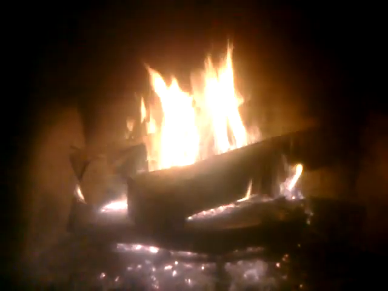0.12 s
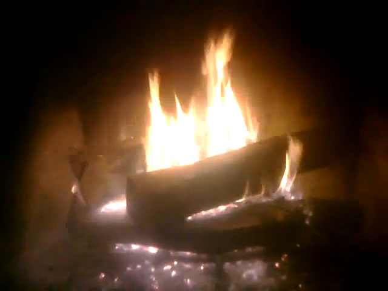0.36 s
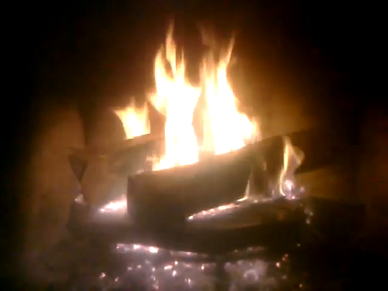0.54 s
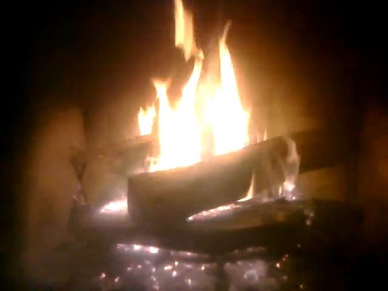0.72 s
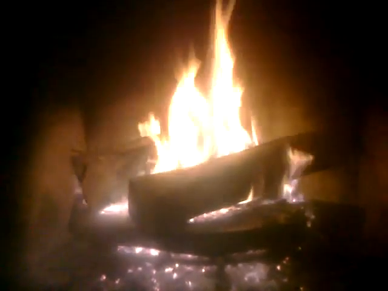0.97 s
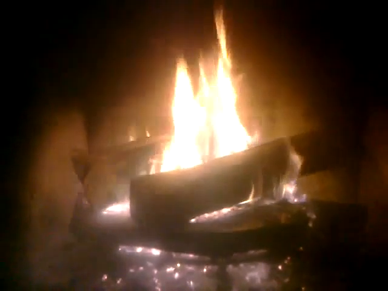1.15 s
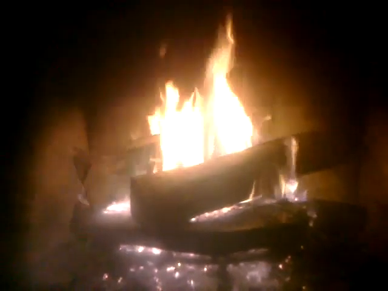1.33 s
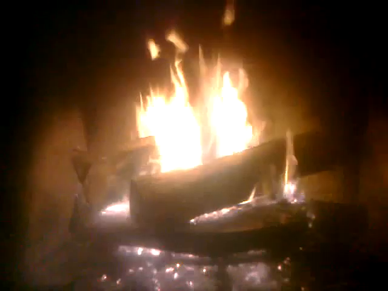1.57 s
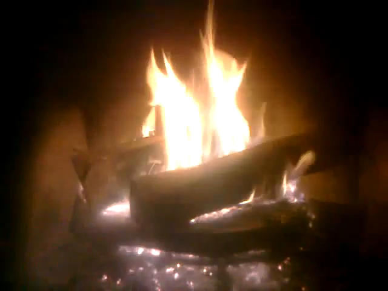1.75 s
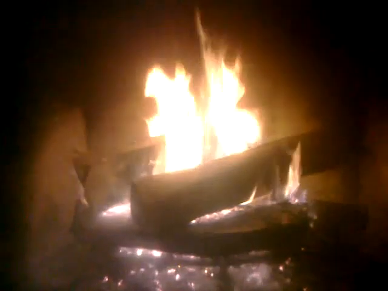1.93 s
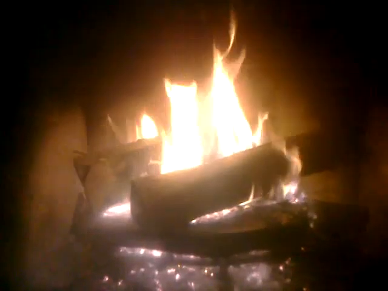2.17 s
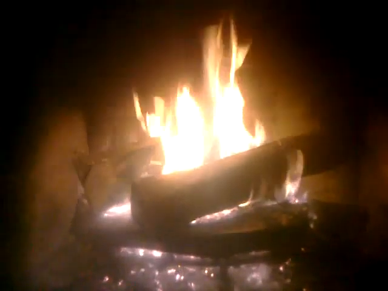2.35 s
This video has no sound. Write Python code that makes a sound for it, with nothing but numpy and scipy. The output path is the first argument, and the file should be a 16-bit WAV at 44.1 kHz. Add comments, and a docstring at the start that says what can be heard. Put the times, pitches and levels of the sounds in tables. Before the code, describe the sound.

A wood fire hisses steadily and rumbles softly, close to the microphone in a room. The wood pops once near the start and ticks lightly. Midway come faint dull knocks and a rustle, then a barely audible whistle.

```python
"""A steady high hiss of steaming sap over a soft rumble of flames: logs burning in a fireplace,
heard close by from one microphone in the room. A pocket in the wood bursts with a loud pop,
followed by small ticks; the firebox rings briefly and the room answers. Midway come a few dull, distant
knocks and a rustle, perhaps wood settling. Near the end, gas whistles faintly through a crack."""
import sys
import numpy as np
from scipy import signal
from scipy.fft import rfft, irfft
from scipy.io import wavfile
from scipy.ndimage import uniform_filter1d

SR = 44100
rng = np.random.default_rng(int(sys.argv[2]) if len(sys.argv) > 2 else 0)


def generate_wav(sig):
    """Save sig (samples, or channels by samples) to the path in sys.argv[1] as 16-bit PCM at SR."""
    pcm = np.round(np.clip(np.atleast_2d(sig).T, -1, 1) * 32767).astype(np.int16)
    wavfile.write(sys.argv[1], SR, pcm)


N = 105840

# decay of the reflections between the firebox walls (frequency [Hz], t60 [s])
FIREBOX_DECAY = [(250, 0.091), (1000, 0.069), (3000, 0.039), (7000, 0.024), (14000, 0.033)]


def amp(db):
    """Decibels to gain."""
    return 10 ** (np.asarray(db) / 20)


def unit(x):
    """Scales to rms 1."""
    return x / np.sqrt(np.mean(x ** 2) + 1e-20)


def read(points, hz):
    """Reads a table on a log-frequency axis."""
    table_hz, value = np.transpose(points)
    return np.interp(np.log(hz + 1), np.log(table_hz + 1), value)


def level(points):
    """A gain curve from (time [s], level [dB]) points."""
    return amp(np.interp(np.arange(N) / SR, *np.transpose(points)))


def add(mix, start_s, sound):
    """Mixes a sound in at its start time."""
    part = mix[round(start_s * SR):][:len(sound)]
    part += sound[:len(part)]


def colour(x, spectrum, size=4096):
    """Minimum-phase filter of unit energy with the given spectrum."""
    log_gain = np.log(amp(read(spectrum, abs(np.fft.fftfreq(size, 1 / SR)))))
    response = np.exp(np.conj(signal.hilbert(log_gain)))
    taps = np.fft.ifft(response).real[:size // 2]
    return signal.fftconvolve(x, taps / np.linalg.norm(taps))[:len(x)]


def noise(spectrum):
    """Steady noise of rms 1 with the given spectrum."""
    gain = amp(read(spectrum, np.fft.rfftfreq(N, 1 / SR)))
    return unit(irfft(rfft(rng.standard_normal(N)) * gain, N))


def wander(rate_hz):
    """Slow random motion of rms 1."""
    lowpass = np.exp(-(np.fft.rfftfreq(N, 1 / SR) / rate_hz) ** 2)
    return unit(irfft(rfft(rng.standard_normal(N)) * lowpass, N))


def echoes(x, decay, delay_s, size=32768):
    """Dense reflections reach the microphone after a delay, each band dying at its own speed."""
    hz, t, bands = signal.stft(rng.choice([-1., 1.], size), SR, nperseg=128)
    fade = amp(-60 * t / read(decay, hz)[:, None])
    _, tail = signal.istft(bands * fade, SR, nperseg=128)
    reflected = np.zeros(N)
    add(reflected, delay_s, signal.fftconvolve(x, tail / np.linalg.norm(tail)))
    return reflected


def steam():
    """A steady hiss from the logs with tiny bursts of boiling sap, rippled by the firebox walls."""
    # spectrum of the escaping steam (frequency [Hz], relative level [dB])
    hiss_spectrum = [(1410, -44), (2400, -21.5), (2900, -13.5), (3190, -7), (3680, -13), (5310, -13.5),
                     (5750, -6.5), (6740, 0), (8610, -8), (12000, -25.5), (14300, -28), (16000, -38)]
    flicker_db, bursts_per_s, spread_db = 0.47, 300, 4.5
    jet = rng.standard_normal(N) * amp(-57.5 + flicker_db * wander(rate_hz=27))
    burst_sizes = amp(spread_db * np.minimum(rng.exponential(1, N), 4))
    sap = unit(burst_sizes * (rng.random(N) < bursts_per_s / SR)) * amp(db=-71.5)
    highpass = signal.butter(4, 2340, "high", fs=SR, output="sos")
    hiss = signal.sosfilt(highpass, colour(jet + sap, hiss_spectrum))
    wall_gain = amp(db=-12)
    walls = wall_gain * echoes(hiss, FIREBOX_DECAY, delay_s=0.0025, size=4096)
    return (hiss + walls) / np.hypot(1, wall_gain)


def flames():
    """Low, lumpy combustion rumble under an even draught."""
    # spectrum of the burning gas (frequency [Hz], relative level [dB])
    rumble_spectrum = [(8, -18), (22, -1), (33, -15), (40, -8), (48, -7), (57, 4), (66, -5), (82, -6),
                       (95, -2.5), (112, -2), (130, -7), (150, -15.5), (220, -30.5), (500, -59)]
    # strength of the rumble (time [s], level [dB])
    rumble_levels = [(0.0, -65.5), (0.07, -54.5), (0.1, -60), (0.41, -54.5), (0.5, -60.5), (0.78, -61.5),
                     (0.8, -55), (0.98, -63), (1.18, -53), (1.21, -61.5), (1.29, -57), (1.62, -54.5),
                     (1.72, -63.5), (1.75, -55.5), (2.18, -58.5), (2.4, -54)]
    # rush of air around the fire (frequency [Hz], relative level [dB])
    draught_spectrum = [(100, -5), (170, -0.5), (260, 0.5), (310, -5), (380, -2.5), (600, -9.5),
                        (900, -11.5), (1350, -11.5), (1600, -11.5), (1880, -8.5), (2150, -14), (2600, -19),
                        (4000, -36)]
    rumble = noise(rumble_spectrum)
    rumble /= np.sqrt(uniform_filter1d(rumble ** 2, size=6000))  # evens out chance swells
    return rumble * level(rumble_levels) + noise(draught_spectrum) * amp(db=-64.5)


def snaps(envelope, passes=8):
    """Random snaps under an envelope, their energy spread evenly over all frequencies."""
    x = rng.standard_normal(len(envelope)) * envelope
    for _ in range(passes):
        whitened = irfft(np.exp(1j * np.angle(rfft(x))), len(x))
        x = envelope * np.sign(whitened)
    return x


def pop(gain_db, length_s, low_hz, high_hz):
    """Wood tears open for a few milliseconds and sets log and firebox ringing."""
    # spectrum of the tearing wood (frequency [Hz], relative level [dB])
    tear_spectrum = [(60, -24), (180, -14.5), (370, -2.5), (600, -11), (900, -7.5), (1400, -13.5),
                     (1870, -8.5), (2400, -11), (2750, -17.5), (3200, -8.5), (3900, -4.5), (4400, -9.5),
                     (5500, -4.5), (6100, 1.5), (6650, -1.5), (7200, 3), (8000, -6.5), (8900, -5),
                     (9700, -15), (12500, -21), (14500, -26), (16500, -28)]
    # resonances of log and firebox (frequency [Hz], relative level [dB], t60 [s])
    modes = [(370, -25, 0.046), (933, -30, 0.068), (1840, -17.5, 0.051), (3130, -16.5, 0.033),
             (3820, -22, 0.035), (5290, -22, 0.053), (6190, -28, .025), (7190, -10, 0.019),
             (8680, -18, .03)]
    attack_s, release_s = 0.00063, 0.00048
    t = np.arange(4096) / SR
    rise = np.minimum(t / attack_s, 1)
    fall = np.exp(-np.maximum(t - length_s, 0) / release_s)
    tear = colour(snaps(rise * fall), tear_spectrum)
    ring = sum(amp(db - 60 * t / t60) * np.sin(2 * np.pi * (hz * t + rng.random()))
               for hz, db, t60 in modes)
    band = signal.butter(2, [low_hz, high_hz], "band", fs=SR, output="sos")
    return amp(gain_db) * signal.sosfilt(band, [tear, rise * ring])


def crackle():
    """Pops reach the microphone directly, then off the firebox walls, then from the room."""
    # pockets bursting in the wood (time [s], gain [dB], length [s], low edge [Hz], high edge [Hz])
    pops = [(0.2396, -19, .0028, 60, 19000), (.2704, -38, 0.0024, 500, 17000),
            (0.2779, -40, 0.0014, 300, 12000), (0.2796, -44, .002, 300, 9000),
            (0.9446, -42, 0.00099, 3200, 13000), (0.979, -40, .0013, 1600, 5500),
            (0.9835, -43, 0.0023, 800, 3500), (1.347, -45, .002, 400, 2780),
            (1.404, -49, 0.0019, 2500, 5030)]
    tears, rings = np.zeros((2, N))
    for start_s, *shape in pops:
        tear, ring = pop(*shape)
        add(tears, start_s, tear)
        add(rings, start_s, ring)
    walls = amp(db=-6.5) * echoes(tears, FIREBOX_DECAY, delay_s=0.0025, size=8192)
    hearth = tears + rings + walls
    # reverberation of the room around the microphone (frequency [Hz], t60 [s])
    room_decay = [(250, 0.7), (1000, 0.76), (4000, 0.61), (8000, 0.32), (14000, 0.21)]
    return hearth + amp(db=-21) * echoes(hearth, room_decay, delay_s=0.015)


def distant_knocks():
    """Dull, distant knocks, each with one hollow ring, over a soft uneven rustle."""
    # dull, distant knocks with a reverberant tail (time [s], gain [dB], t60 [s], ring frequency [Hz])
    hits = [(0.983, -57.5, 0.18, 1730), (1.185, -60.5, 0.29, 1090), (1.348, -53, 0.21, 1070),
            (1.386, -56.5, 0.19, 523)]
    # dull tone of the knocks (frequency [Hz], relative level [dB])
    knock_spectrum = [(120, -18), (300, -8), (500, 1), (750, -4.5), (1100, -3), (1750, -1), (2400, -8.5),
                      (3200, -7), (5000, -11), (7000, -10), (14000, -47)]
    # swell of the rustle around the knocks (time [s], level [dB])
    rustle_levels = [(0, -76), (.75, -71), (.95, -67.5), (1.05, -64.5), (1.14, -65), (1.22, -64.5),
                     (1.32, -62), (1.42, -60), (1.52, -66.5), (1.65, -75), (2.32, -88), (2.39, -62)]
    # tone of the rustle (frequency [Hz], relative level [dB])
    rustle_spectrum = [(150, -27), (350, -8), (500, 2.5), (750, -1), (1080, -0.5), (1700, 0), (2400, -10.5),
                       (4000, -8), (8000, -24)]
    attack_s, ring_width_hz, flicker_db = 0.0024, 47, 0.54
    t = np.arange(SR // 2) / SR
    knocks = np.zeros(N)
    for start_s, gain_db, t60, ring_hz in hits:
        envelope = np.minimum(t / attack_s, 1) * amp(gain_db - 60 * t / t60)
        thud = rng.standard_normal(len(t)) * envelope
        ring = signal.lfilter(*signal.iirpeak(ring_hz, ring_hz / ring_width_hz, fs=SR), thud)
        add(knocks, start_s, thud + amp(db=6.5) * ring)
    rustle = noise(rustle_spectrum) * level(rustle_levels) * amp(flicker_db * wander(rate_hz=30))
    return colour(knocks, knock_spectrum) + rustle


def whistle():
    """Gas finds a narrow crack in a log and sings faintly."""
    start_s, rise_s, pitch_hz, waver_hz = 2.11, 0.08, 4970, 3.1
    swell = np.clip((np.arange(N) / SR - start_s) / rise_s, 0, 1)
    cycles = np.cumsum(pitch_hz + waver_hz * wander(rate_hz=30)) / SR
    return amp(db=-74.5) * swell * unit(np.sin(2 * np.pi * cycles))


def scene():
    """The fire and the distant knocks in mono, from one spot near the hearth."""
    return (steam() + flames() + crackle() + distant_knocks() + whistle())[None]


def record(dry):
    """The recorder behind the microphone cuts off the highest treble."""
    lowpass = signal.firwin(511, cutoff=16200, window=("kaiser", 9), fs=SR)
    return signal.oaconvolve(dry, lowpass[None], "same")


dry = scene()
out = record(dry)
generate_wav(out)
```